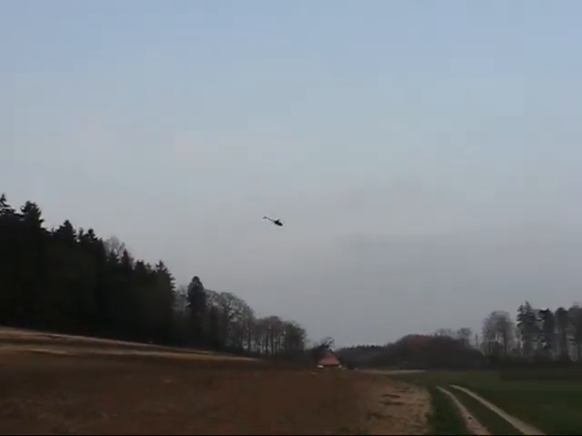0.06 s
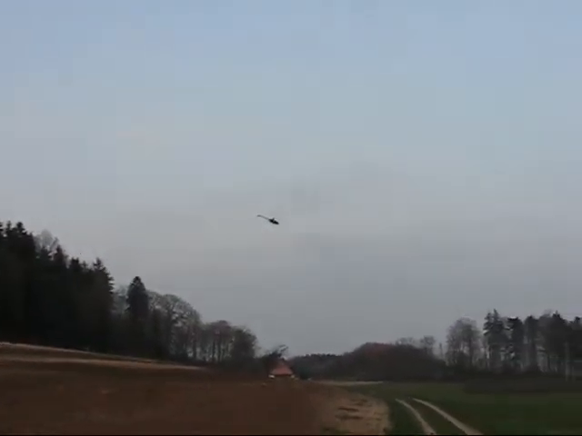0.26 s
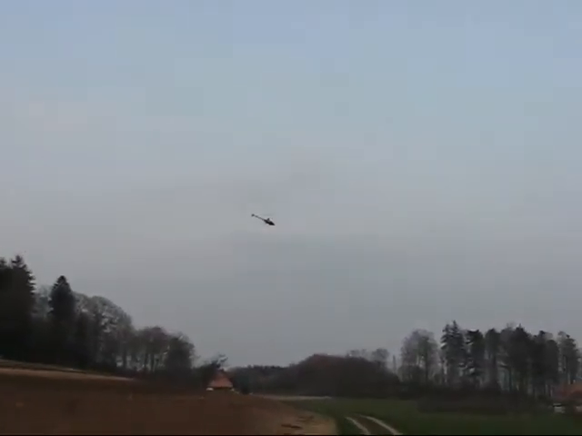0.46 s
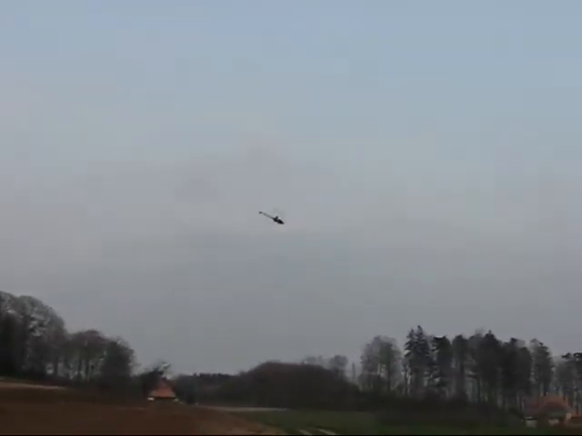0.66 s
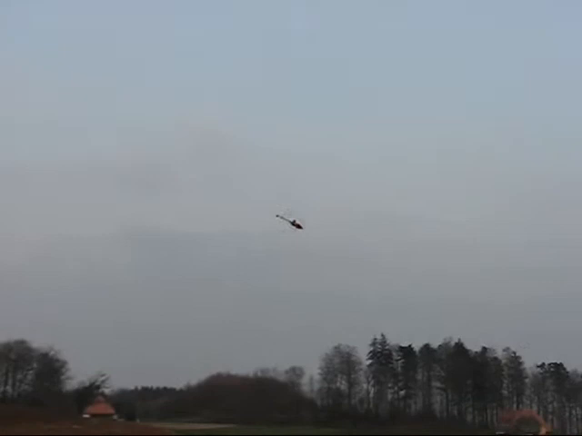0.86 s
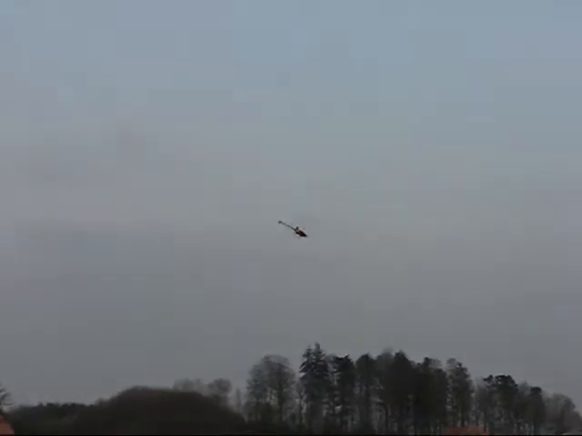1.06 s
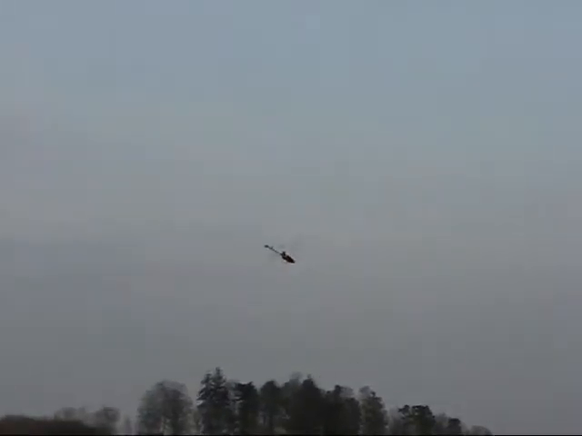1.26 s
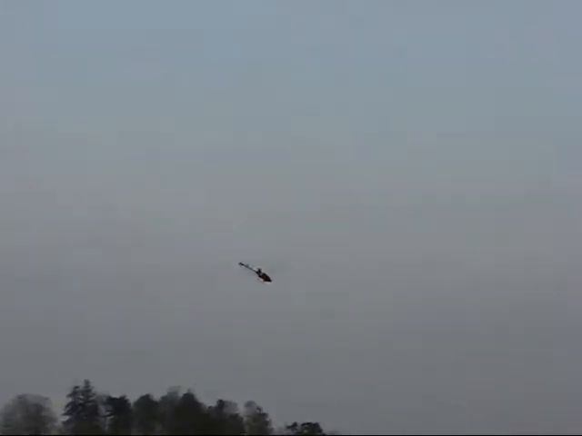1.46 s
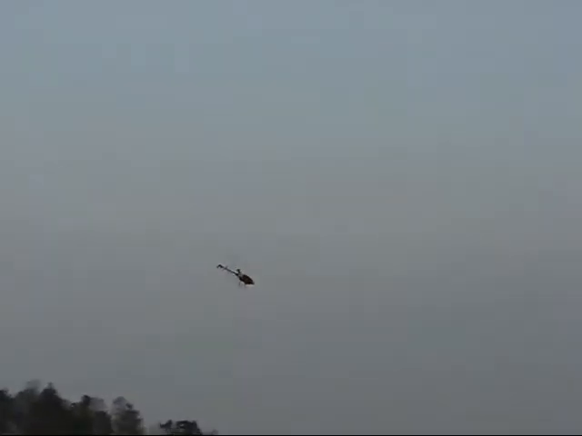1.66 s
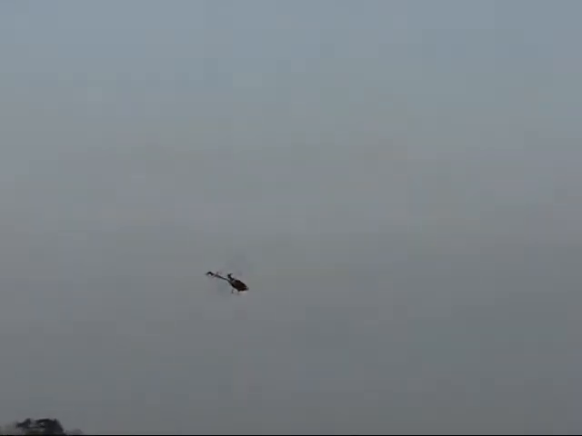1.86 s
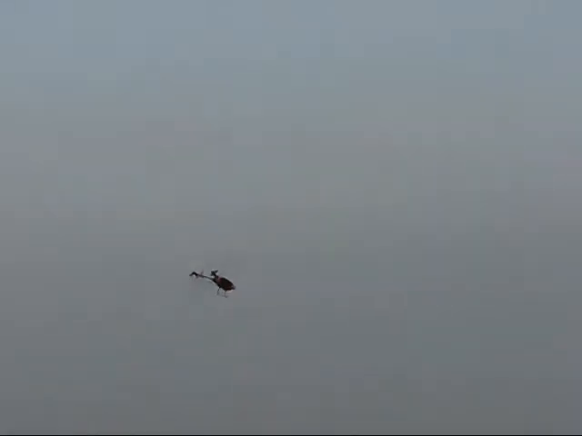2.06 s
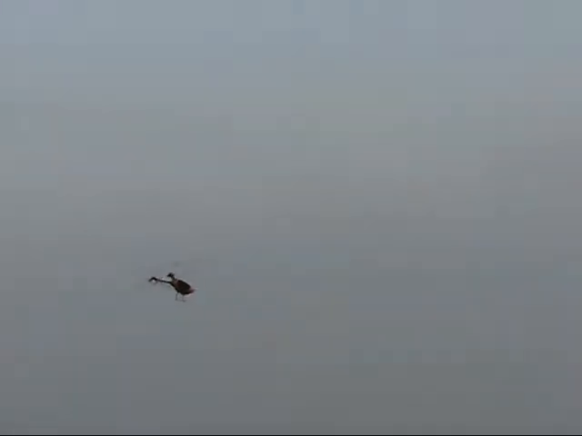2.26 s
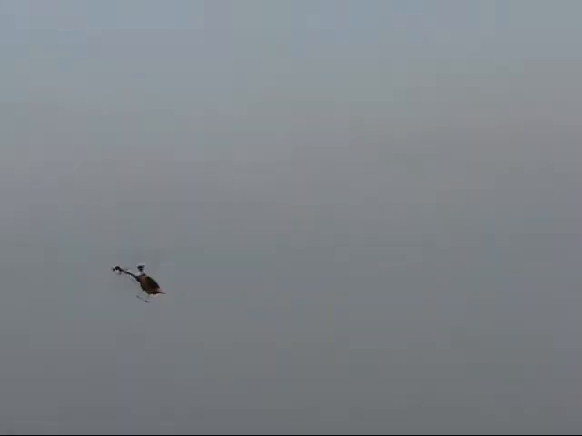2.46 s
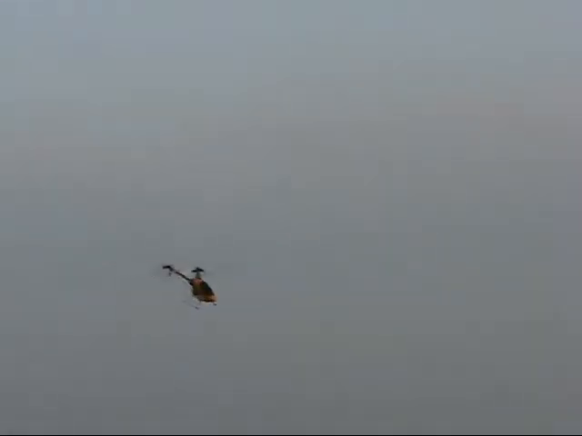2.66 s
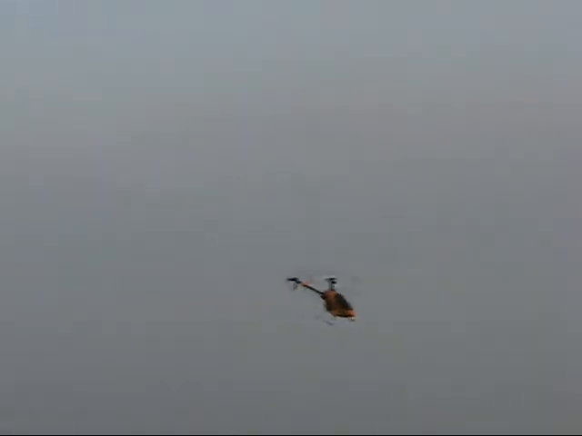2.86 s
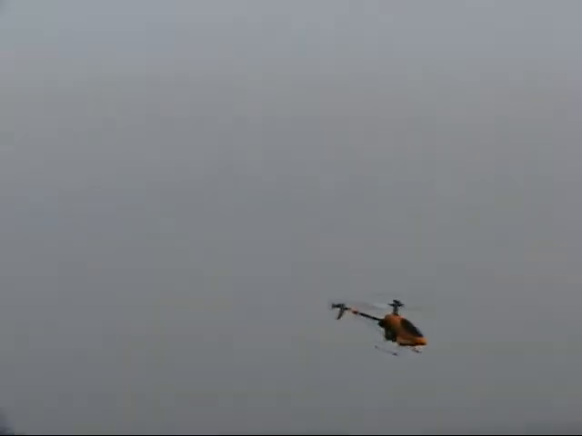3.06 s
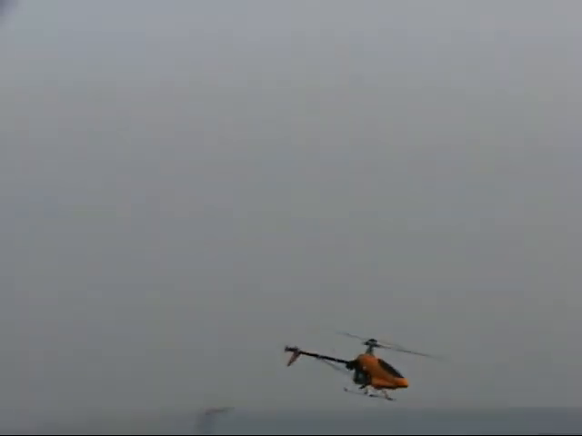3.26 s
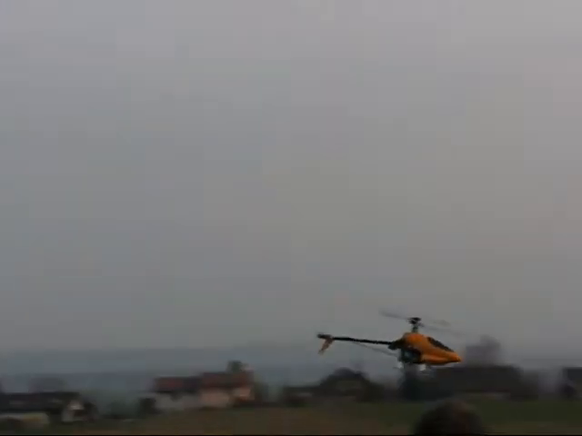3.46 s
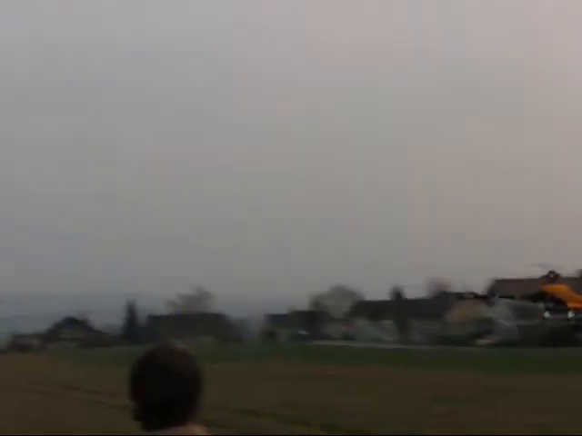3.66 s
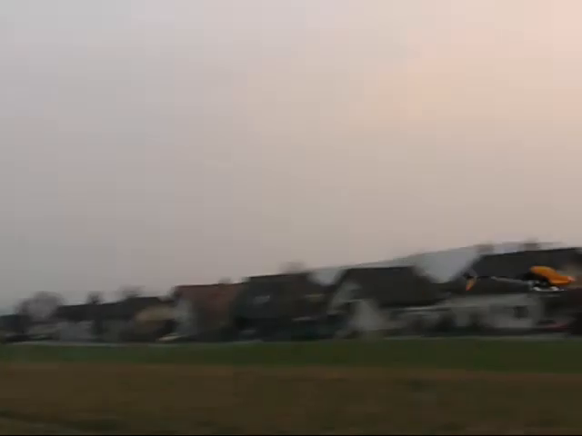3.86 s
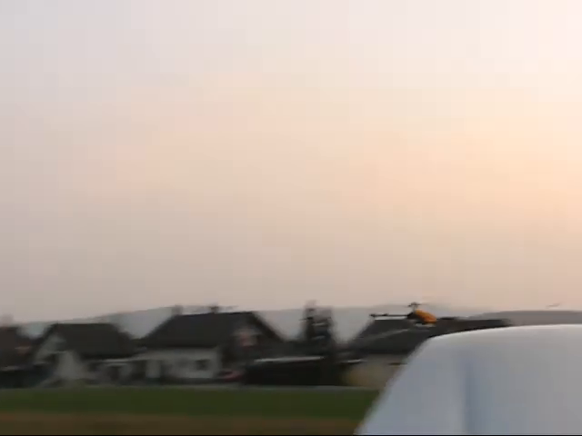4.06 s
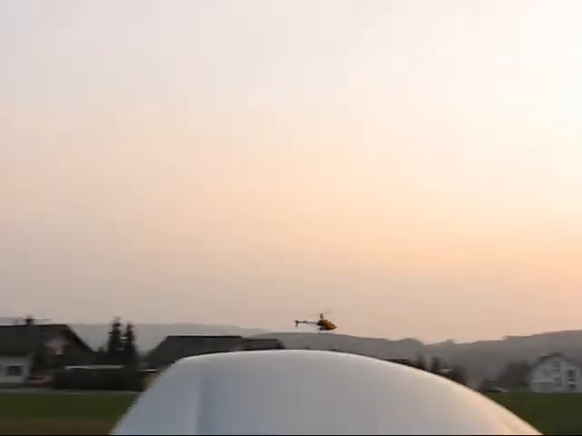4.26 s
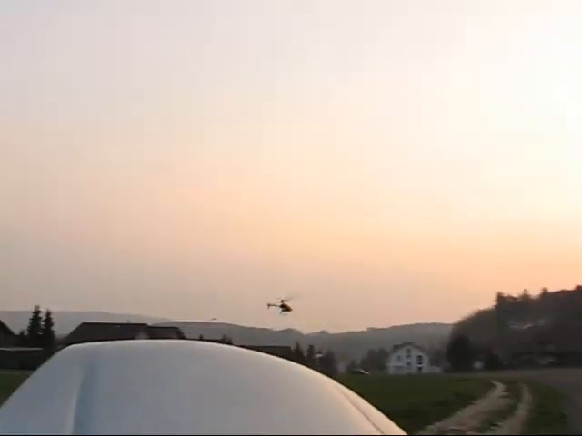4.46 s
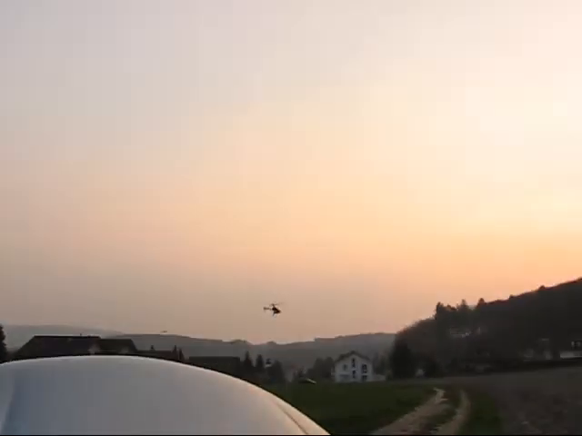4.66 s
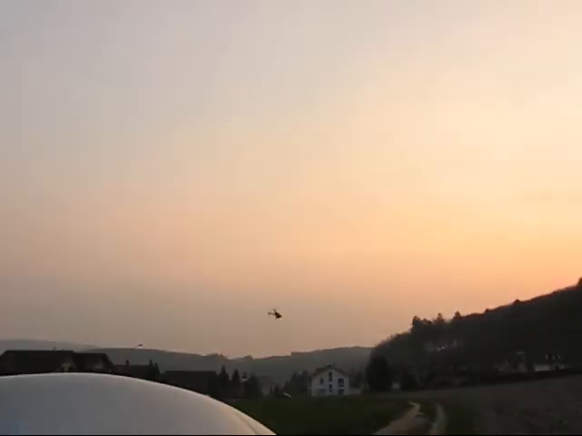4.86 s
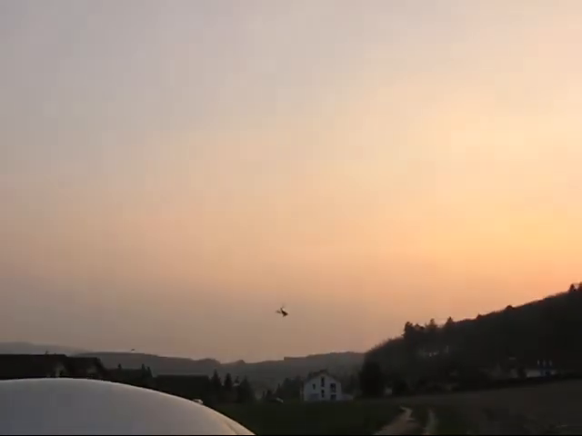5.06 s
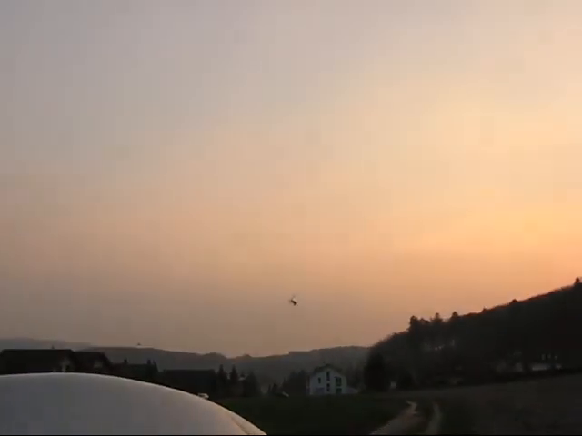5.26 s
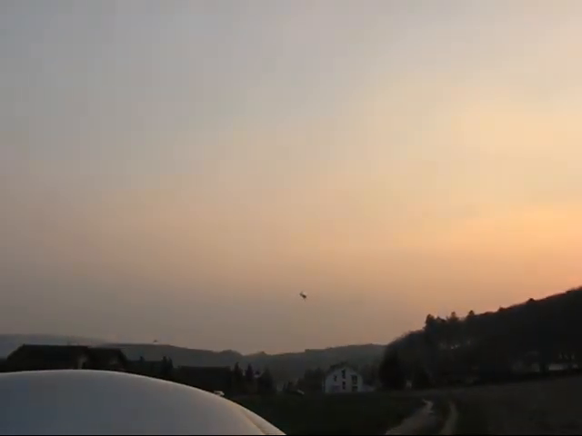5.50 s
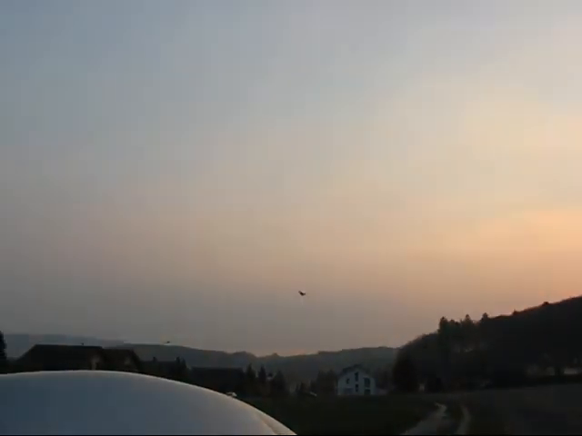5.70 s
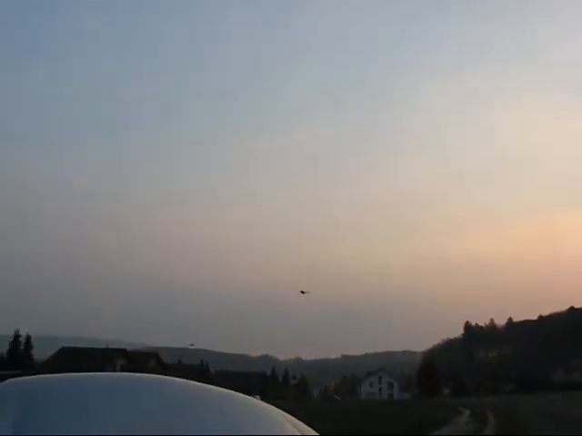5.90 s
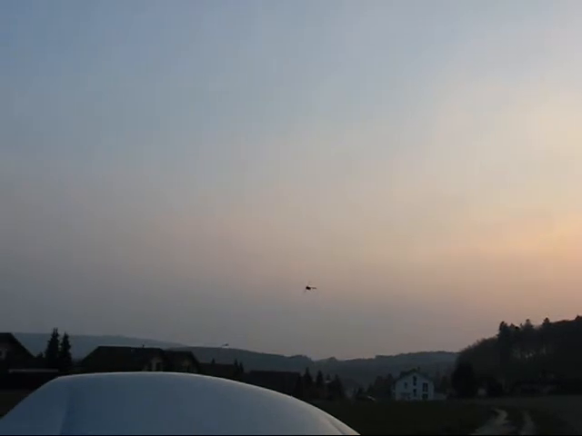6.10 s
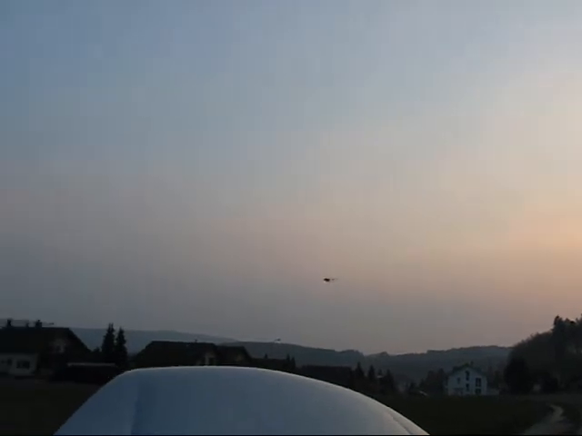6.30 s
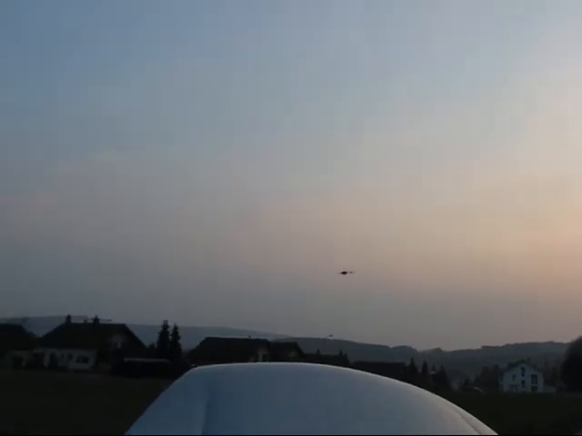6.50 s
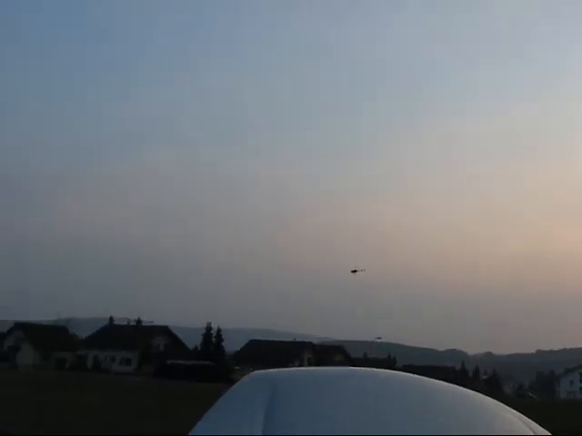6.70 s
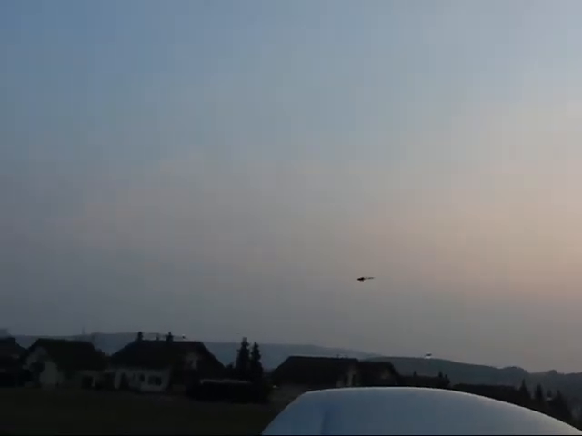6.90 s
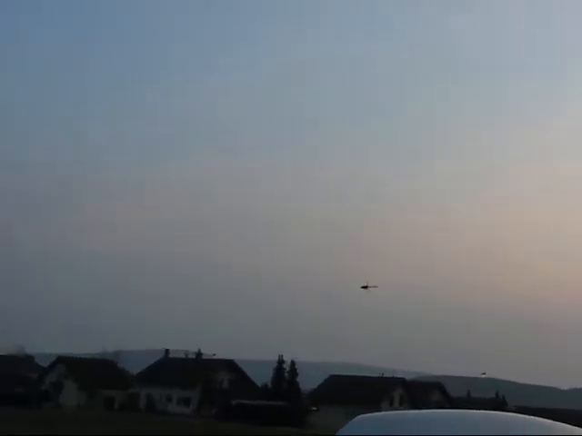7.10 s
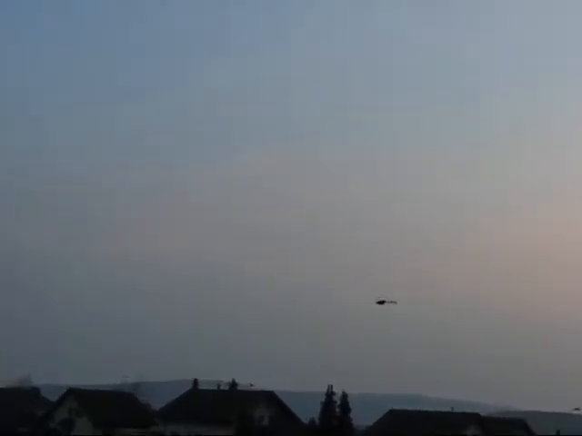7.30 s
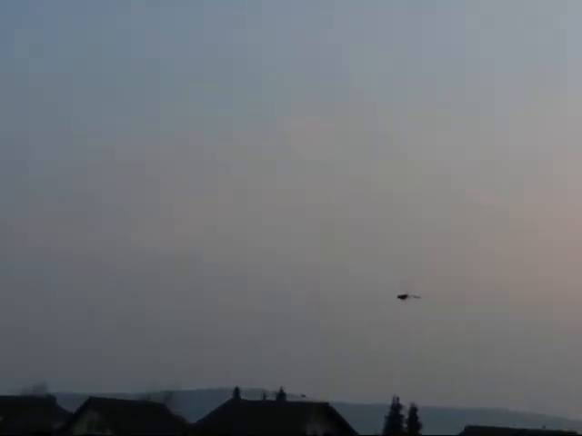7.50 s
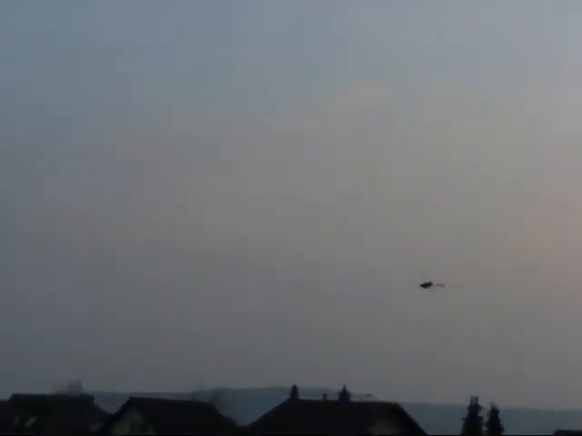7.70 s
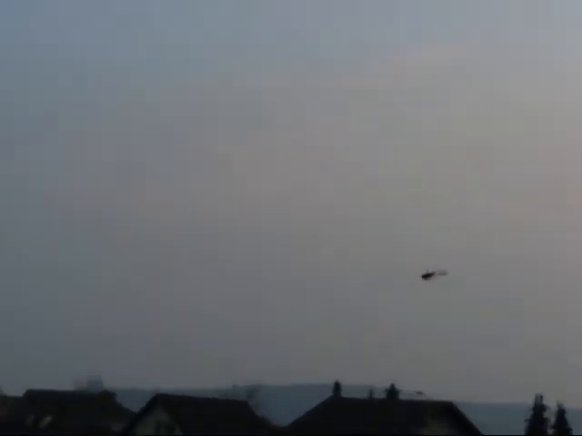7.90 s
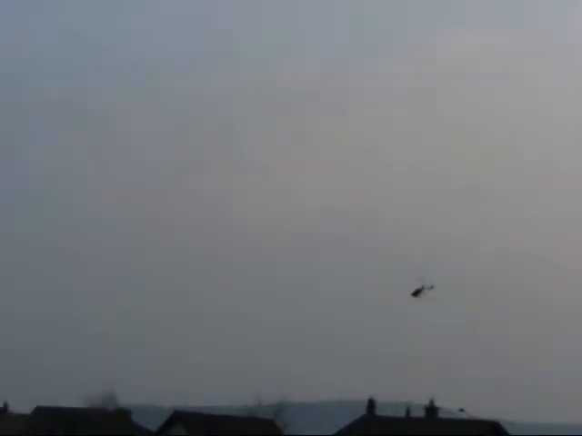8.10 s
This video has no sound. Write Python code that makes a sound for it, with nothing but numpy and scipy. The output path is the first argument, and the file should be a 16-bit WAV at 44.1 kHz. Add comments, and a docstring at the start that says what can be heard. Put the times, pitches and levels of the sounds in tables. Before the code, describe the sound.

A small model helicopter flies over an open field, heard through a small handheld stereo camera microphone with faint dull hiss. From 0 s its engine is already at flight power: a reedy, buzzing whine with many harmonics, a high throbbing gear whine, a rapid flutter of blades and soft airy rush. From 1 to 3 s it comes nearer, pitch creeping upward, tail buzz and thin blade whistle more noticeable. Around 3 to 3.7 s it passes close, at its loudest, with a broad rush of churned air and hissing exhaust, while the pitch slides down until about 4.3 s. It stays raspy and strong from behind to about 4.8 s, then the air rush drops away and the tone thins, fluttering unevenly, with a brief swell near 5.9 s. From 6.5 to 8.1 s it is distant and softer, pitch rising again as it turns back. The sound continues to the end.

```python
"""Model helicopter fly-by

A glow-engined model helicopter flies in over a field, passes close by, leaves and turns back.
One crankshaft speed drives it all: sine partials make the exhaust note, a throbbing gear whine and
the tail rotor's buzz. The main blades thump, slap, whistle and churn filtered noise into a rush.
A small stereo camera hears it through two close ports, each with a faint noise of its own."""
import sys
import numpy as np
from scipy import signal
from scipy.fft import rfft, irfft
from scipy.io import wavfile
from scipy.ndimage import map_coordinates

SR = 44100
rng = np.random.default_rng(int(sys.argv[2]) if len(sys.argv) > 2 else 0)


def wav_out(sig):
    """Save sig, one row per channel (or a flat mono array), as 16-bit PCM at SR to the path in sys.argv[1]."""
    wavfile.write(sys.argv[1], SR, np.round(np.clip(np.atleast_2d(sig).T, -1, 1) * 32767).astype(np.int16))


N = 358974

# Flight past the listener. Each row: time in seconds, relative exhaust level in dB,
# side facing the listener in degrees (0 nose, 90 flank, 180 tail).
FLIGHT_PATH = [(0.0, 1, 27), (0.45, -2.5, 39), (1.0, -2.0, 25), (1.45, -3.5, 23), (2.0, -2, -4),
               (2.4, 2, 12.5), (2.7, 2.5, 13), (3.1, 11.5, 35.5), (3.5, 9.5, 61), (3.85, 2.5, 98),
               (4.15, 3, 141), (4.5, 4.5, 155), (4.9, 4, 176), (5.5, -1, 134), (5.95, 2.5, 105),
               (6.5, -3, 84), (7.4, -7.5, 69), (8.14, -4, 56)]
# How hard the main blades bite. Each row: time in seconds, slap level in dB before contrast and trim.
BLADE_BITE = [(0.0, -47), (0.29, -44.5), (0.7, -48), (1.75, -40), (3.35, -42.5), (3.54, -37), (3.58, -44),
              (3.67, -40), (3.72, -49), (3.83, -41), (3.85, -47), (4.24, -43.5), (5.73, -55), (6.39, -42.5),
              (7.51, -48), (8.14, -50.5)]
# The rush follows the helicopter's nearness. Each row: time in seconds, level in dB before trim.
RUSH_NEARNESS = [(0.0, -38), (1.75, -38), (2.38, -36.5), (2.43, -38), (3.44, -28.5), (3.99, -29),
                 (4.06, -27.5), (4.28, -32.5), (4.49, -32.5), (4.6, -36.5), (4.9, -36), (5.55, -44.5),
                 (5.71, -41), (5.85, -43), (5.98, -40.5), (6.41, -43), (6.82, -40.5), (8.14, -42)]


def undb(db):
    """Decibels to gain."""
    return 10 ** (np.asarray(db) / 20)


def unit(x):
    """Scale to rms 1."""
    return x / np.sqrt(np.mean(x ** 2))


def curves(table):
    """Interpolate each column of a timed table, sample by sample."""
    seconds, *columns = np.transpose(table)
    t = np.arange(N) / SR
    return [np.interp(t, seconds, column) for column in columns]


def colour(x, points, share=1):
    """Filter by a (Hz, dB) spectrum, or by a share of its decibels."""
    hz, db = np.transpose(points)
    bins = np.maximum(np.arange(N // 2 + 1) * SR / N, 1)
    response_db = np.interp(np.log(bins), np.log(hz), db)
    return irfft(rfft(x) * undb(share * response_db), N)


def noise():
    """White noise."""
    return rng.standard_normal(N)


def walk(rate):
    """Smooth random drift of rms 1 that changes about rate times a second."""
    bins = np.arange(N // 2 + 1) * SR / N
    return unit(irfft(rfft(noise()) / (1 + (bins / rate) ** 4), N))


def swell(turns, depth_db):
    """A gain of rms 1 that peaks once a turn."""
    return unit(undb(depth_db * np.cos(2 * np.pi * turns)))


def highpass(order, hz):
    """Butterworth high-pass sections."""
    return signal.butter(order, hz, "high", fs=SR, output="sos")


def delayed(x, lag):
    """Read x a moving number of samples late."""
    return map_coordinates(x, [np.arange(N) - lag], order=3, mode="nearest")


def deepened(level_db, contrast):
    """Widen the swings of a level about its mean."""
    return level_db + contrast * (level_db - level_db.mean())


def nearness_db():
    """How far the rush stands above its mean level."""
    rush_db = curves(RUSH_NEARNESS)[0]
    return rush_db - rush_db.mean()


def from_behind():
    """0 when the nose faces the listener, 1 when the tail does."""
    angle = curves(FLIGHT_PATH)[1]
    return (1 - np.cos(np.radians(angle))) / 2


def port_noise(level_db=-53.5):
    """Each microphone port adds a faint dull noise of its own."""
    # Dull port hiss. Each row: frequency in Hz, relative level in dB per Hz.
    port_spectrum = [(40, -18), (200, -6.5), (1000, 2), (8000, -15), (13000, -30)]
    return undb(level_db) * np.array([unit(colour(noise(), port_spectrum)) for _ in range(2)])


def churned_air(crank, blade, rush_trim_db=7.5, hiss_trim_db=1.5, hiss_contrast=0.094, ground=0.11):
    """Turbulence swells with each blade; exhaust gas hisses at each firing; the ground echoes both."""
    # Colours of wake roar, blade rush and gas hiss. Each row: frequency in Hz, relative level in dB per Hz.
    roar_spectrum, rush_spectrum, hiss_spectrum = [(50, -24), (180, -11), (300, -4.5), (440, 0.5),
                                                   (650, -3), (1000, 0), (2000, -24)], [(100, -67), (600, -24.5),
                                                                        (900, -6.5), (1200, -4.5),
                                                                        (1600, -1), (2600, -1), (3800, 0.5),
                                                                        (5800, -0.5), (8200, 0.5),
                                                                        (9500, -13.5), (12000, -52)], [(5000, -9),
                                                                                      (8300, -1),
                                                                                      (9500, 5.5),
                                                                                      (11500, 0),
                                                                                      (13500, -4),
                                                                                      (15500, -10)]
    # Fine hiss of the exhaust gas. Each row: time in seconds, level in dB before contrast and trim.
    gas_level = [(0.0, -44), (0.38, -50), (0.5, -42.5), (2.06, -42.5), (2.36, -39.5), (2.63, -46),
                 (2.92, -36.5), (3.24, -37), (3.44, -32), (4.1, -33), (5.08, -43), (5.49, -52), (6.03, -47),
                 (6.39, -52.5), (7.96, -49), (8.14, -51)]
    # Height in the sky. Each row: time in seconds, elevation in degrees.
    sky_height = [(0, 18), (1.5, 24), (2.2, 36), (3.5, 12), (3.9, 6.7), (5, 3.2), (6, 4.88), (8.14, 7.7)]
    camera_height_m, sound_speed_m_s = 1.7, 343
    behind, bite_db = from_behind(), curves(BLADE_BITE)[0]

    # the low roar carries far and grows with the blades' bite
    roar = unit(colour(noise(), roar_spectrum)) * swell(blade, depth_db=0.5)
    roar_db = -43 + 0.47 * nearness_db() + 0.31 * (bite_db - bite_db.mean())

    rush = unit(colour(noise(), rush_spectrum)) * swell(blade, depth_db=1.0)
    rush = rush * swell(crank, depth_db=0.24) * undb(0.63 * walk(9.9))
    # the blades throw their treble forwards, so the rush is duller from behind
    rush = rush - 0.17 * behind * signal.sosfiltfilt(highpass(2, 4800), rush)
    rush_db = curves(RUSH_NEARNESS)[0] + rush_trim_db

    hiss = unit(colour(noise(), hiss_spectrum)) * swell(blade, depth_db=1.0)
    hiss = hiss * swell(crank, depth_db=2.2) * undb(0.7 * walk(9.9))
    # its top is a little duller from behind too
    hiss = hiss - 0.09 * behind * signal.sosfiltfilt(highpass(4, 11500), hiss)
    hiss_db = deepened(curves(gas_level)[0], hiss_contrast) + hiss_trim_db

    air = roar * undb(roar_db) + rush * undb(rush_db) + hiss * undb(hiss_db)
    # the ground echo's extra path changes with elevation and sweeps a comb through the air noise
    elevation = np.radians(curves(sky_height)[0])
    echo_s = 2 * camera_height_m * np.sin(elevation) / sound_speed_m_s
    return air + ground * delayed(air, echo_s * SR)


def tip_whistle(blade, swing=0.29, blur_hz=480, other_tip_db=-13):
    """Each tip whistles, sweeping up in pitch as it swings towards the listener; one is the louder."""
    # Whistle of the blade tips. Each row: time in seconds, level in dB, highest pitch in Hz before blur.
    tip_curve = [(0, -74, 10500), (1, -51, 11400), (2.1, -41, 13930), (2.46, -36, 14060),
                 (2.54, -58, 13950), (2.85, -38, 13800), (3.8, -43, 12700), (5, -79, 12000),
                 (8.14, -50, 13290)]
    level_db, top_hz = curves(tip_curve)
    whistle = 0
    # two blades, so a rotor turn is two blade passes
    for turn, tip_db in ((blade / 2, 0), (blade / 2 + .5, other_tip_db)):
        sweep = 1 - swing + swing * np.cos(2 * np.pi * (turn - .07))
        hz = top_hz * sweep + blur_hz * walk(1530)
        tone = np.sin(2 * np.pi * np.cumsum(hz) / SR)
        whistle = whistle + tone * swell(turn, depth_db=40) * undb(tip_db + 2 * walk(25))
    return unit(whistle) * undb(level_db)


def tail_rotor(crank, gear_ratio=.953):
    """The small geared blades buzz just under the engine note and beat with it."""
    # Buzz loudness. Each row: time in seconds, level in dB.
    tail_level = [(0, -54), (1.5, -49), (2.4, -42.5), (3.2, -43), (3.7, -56.5), (4.3, -84), (5.5, -70),
                  (6.3, -52), (7.2, -45), (8.14, -56)]
    # Buzz partials. Each row: multiple of the buzz pitch, relative level in dB.
    tail_partials = [(1, 5.5), (2, -4), (3, -2)]
    buzz = 0
    for k, db in tail_partials:
        gain = undb(db + 2 * walk(0.79))
        buzz = buzz + gain * np.sin(2 * np.pi * round(k) * gear_ratio * crank)
    return unit(buzz) * undb(curves(tail_level)[0])


def gears(crank, blade, teeth=27, throb_db=-0.8, firing_db=4.5, slip=0.36, rattle=0.37, contrast=0.097):
    """The teeth whine, loaded four times a rotor turn and at each firing; backlash blurs the note."""
    # Gear whine. Each row: time in seconds, level in dB before contrast.
    whine_level = [(0.0, -24.5), (0.07, -33.5), (1.16, -30), (1.38, -37.5), (2.45, -29), (3.7, -18),
                   (3.83, -26), (4.1, -21.5), (4.22, -26), (4.87, -26.5), (5.1, -38), (5.42, -41.5),
                   (5.76, -32), (5.89, -38), (5.98, -29.5), (6.6, -38), (6.73, -32.5), (8.14, -45.5)]
    whine_db = deepened(curves(whine_level)[0], contrast)
    # the load also twists the shaft
    twist = 1.2 * np.cos(4 * np.pi * blade)
    mesh = 2 * np.pi * teeth * crank + twist + slip * walk(32)
    tone = (1 + rattle * walk(250)) * np.sin(mesh) + rattle * walk(200) * np.cos(mesh)
    # the throb's depth follows the whine's level
    throb = swell(2 * blade, throb_db + 0.12 * (whine_db - whine_db.mean()))
    load = throb * swell(crank, firing_db)
    return unit(tone * load) * undb(whine_db)


def main_rotor(blade, scatter_db=1.9, slap_trim_db=1.0, contrast=0.12, sharpen=1.1):
    """Each passing blade pushes the air and slaps the wake of the one before."""
    # Colour of the slap. Each row: frequency in Hz, relative level in dB per Hz.
    slap_spectrum = [(60, -40), (120, -75), (175, -19), (225, -9), (275, 4.5), (335, 8.5), (410, 0),
                     (620, -24), (850, 0), (1300, -41), (3000, -26), (12000, -47)]
    # Air pushed by the blades. Each row: time in seconds, thump level in dB,
    # level of its octave in dB before trim.
    push_level = [(0.0, -59, -59), (0.11, -59, -54), (1.02, -52.5, -59), (1.84, -52, -62),
                  (2.65, -47, -47.5), (2.99, -51, -65), (3.17, -49, -52), (3.26, -64, -57),
                  (3.42, -49, -47), (4.01, -51.5, -56), (5.4, -62, -59), (5.62, -68, -70),
                  (6.28, -55, -53.5), (7.48, -65, -54.5), (7.93, -58, -55), (8.14, -72, -57)]
    push_db, octave_db = curves(push_level)
    bite_db = deepened(curves(BLADE_BITE)[0], contrast)

    # one click a blade pass, each of its own strength
    passes = np.diff(np.floor(blade), prepend=np.floor(blade[0]))
    slap = unit(colour(passes * undb(scatter_db * walk(47)), slap_spectrum))

    # far off the disc is seen edge-on and its pulse is sharper: the third partial gains
    third_db = bite_db - 14 - sharpen * nearness_db()
    thump = 0
    for k, db in enumerate((push_db, octave_db - 1, third_db), 1):
        thump = thump + np.sin(2 * np.pi * k * blade) * undb(db)
    return slap * undb(bite_db + slap_trim_db) + np.sqrt(2) * thump


def exhaust(crank, loudest_trim_db=0.35, flutter_db=1.75, rough=0.084,
            edge_db=-55, edge_fall_db=5.0, ahead_db=-7):
    """One firing a turn gives a stack of partials; their beams sweep past and moving air flutters each."""
    # How the muffler beams its partials. Each row: multiple of crank speed, then levels in dB,
    # before the flight level, at even steps of angle from nose to tail.
    muffler_beams = [(1, -47, -51.5), (2, -44.5, -51, -55.5, -48, -45, -43, -42.5),
                     (3, -34, -46.5, -41.5, -53, -50.5, -48, -50), (4, -44, -57.5, -54.5, -39.5, -53),
                     (5, -51.5, -38.5, -46.5, -44, -34.5, -34.5, -42.5, -44, -44),
                     (8, -58, -52, -39, -42.5, -52.5, -46, -46), (10, -50, -53), (11, -43.5, -43, -56),
                     (12, -44.5, -49, -43), (13, -48, -50.5, -45, -39, -48), (14, -45, -44, -49),
                     (15, -44, -49.5), (16, -55.5, -43.5), (17, -53, -48),
                     (18, -45, -42, -45.5, -42.5, -46, -43, -31), (19, -47, -50, -55), (20, -57, -63)]
    # The three loudest partials swell and fade each on its own.
    # Each row: time in seconds, level in dB before trim.
    loudest = {6: [(0.05, -42), (0.35, -36.0), (1.1, -46), (1.4, -38.5), (1.55, -54), (3.05, -25),
                   (3.65, -40), (5.75, -30), (6.2, -40.5), (6.35, -45), (6.5, -54.0), (6.95, -38.5),
                   (7.1, -49), (7.55, -41.5), (7.85, -46), (8.14, -38)], 7: [(0.05, -52.0), (0.65, -59), (0.95, -44), (1.1, -61), (2.0, -38.5),
                                     (3.2, -50.5), (3.35, -38.0), (3.5, -44), (3.95, -30.5), (4.25, -36.0),
                                     (4.55, -35), (4.7, -39.0), (5.9, -30), (6.65, -37.5), (7.4, -52.5),
                                     (8.14, -53)], 9: [(0.05, -38.5), (1.55, -41.0), (2.0, -48.5),
                                                         (2.45, -35.5), (2.75, -43.5), (3.2, -29.5),
                                                         (3.35, -41), (3.65, -33), (3.8, -41),
                                                         (3.95, -31.5), (4.25, -23.5), (4.7, -45),
                                                         (5.6, -45.5), (6.2, -35.5), (6.65, -49.5),
                                                         (8.14, -52)]}
    level_db, angle = curves(FLIGHT_PATH)
    behind = from_behind()

    partials = []
    for k, *beam in muffler_beams:
        beam_db = np.interp(np.radians(angle), np.linspace(0, np.pi, len(beam)), beam)
        partials.append((round(k), level_db + beam_db))
    for k, table in loudest.items():
        partials.append((k, curves(table)[0] + loudest_trim_db))
    # the sharp edge of each puff is heard mostly from behind the outlet
    edge = level_db + edge_db + ahead_db * (1 - behind)
    for i, k in enumerate(range(21, 33)):
        partials.append((k, edge - edge_fall_db * i))

    note = 0
    for k, db in partials:
        # short waves are scattered most
        flutter = flutter_db * np.sqrt(k / 10) * walk(4.7)
        # the fuselage smears each puff; from behind it stays more of a pulse
        smear = (rng.random() - .5) * (1 - 0.35 * behind)
        note = note + undb(db + flutter) * np.sin(2 * np.pi * (k * crank + smear))
    # firings differ in strength
    return np.sqrt(2) * note * (1 + rough * walk(100))


def camera(sound, side_db=-13):
    """Two close ports hear the direct sound a little apart, and the field's shifting scatter each its own way."""
    # Left minus right of the two ports. Each row: frequency in Hz, difference in dB.
    port_difference = [(700, 0.4), (1600, 0.1), (2400, -2.6), (4000, -2.5), (6500, 2.0), (8000, 0.6),
                       (10300, -4.3), (13500, 3.0)]
    # Bearing as the camera follows. Each row: time in seconds, lead of the left port in samples.
    port_lead = [(0, .9), (2.6, 1), (3.4, .5), (3.85, -.8), (4.5, .7), (5.5, .4), (6.6, -.3), (8.14, -.3)]
    t = np.arange(4096) / SR
    field = rng.standard_normal(len(t)) * np.exp(-t / .015)
    scattered = signal.fftconvolve(sound, field / np.linalg.norm(field))[:N]
    scattered = delayed(scattered, 10 * walk(2))
    # the scatter is added to one port and subtracted from the other
    side = undb(side_db) * signal.sosfilt(highpass(1, 1500), scattered)
    half_lead = curves(port_lead)[0] / 2
    left = colour(delayed(sound, -half_lead) + side, port_difference, .5)
    right = colour(delayed(sound, half_lead) - side, port_difference, -.5)
    return np.array([left, right])


def scene(blade_ratio=.209):
    """The crankshaft, never quite even, turns everything else through fixed gears."""
    # Crank speed as heard, Doppler shift included. Each row: time in seconds, turns per second in Hz.
    crank_speed = [(0, 264.5), (0.7, 267.2), (1.4, 272.1), (1.9, 274.6), (2.99, 285.1), (3.31, 282.3),
                   (3.65, 275.1), (4.13, 267.1), (4.31, 265.8), (5.05, 268.2), (5.33, 270.7), (5.78, 266.8),
                   (6.05, 268.1), (6.55, 271.3), (6.76, 274.4), (7.12, 275.1), (7.64, 281.6), (8.14, 289.7)]
    steady = np.cumsum(curves(crank_speed)[0]) / SR
    # small slow and fast unevenness, in turns
    crank = steady + .004 * walk(10) + .0015 * walk(120)
    # counts blade passes
    blade = blade_ratio * steady
    air = churned_air(crank, blade) + tip_whistle(blade)
    machine = tail_rotor(crank) + gears(crank, blade) + main_rotor(blade) + exhaust(crank)
    return port_noise() + camera(air + machine)


def record(dry, top_hz=15600):
    """The camera cuts the top with a steep low-pass."""
    return signal.sosfilt(signal.ellip(10, .2, 80, top_hz, fs=SR, output="sos"), dry)


dry = scene()
out = record(dry)
wav_out(out)
```